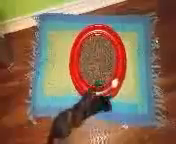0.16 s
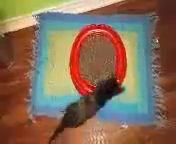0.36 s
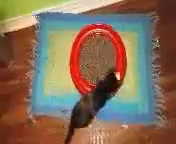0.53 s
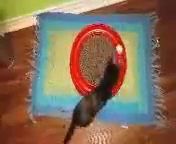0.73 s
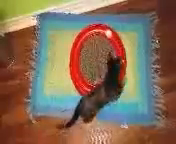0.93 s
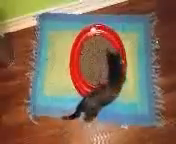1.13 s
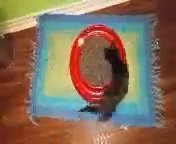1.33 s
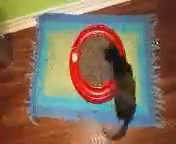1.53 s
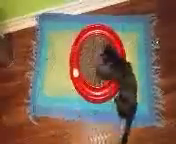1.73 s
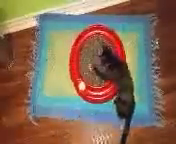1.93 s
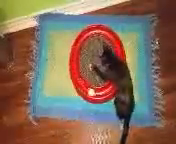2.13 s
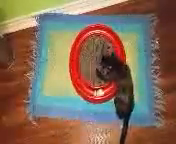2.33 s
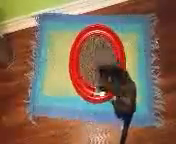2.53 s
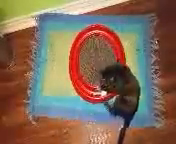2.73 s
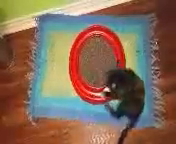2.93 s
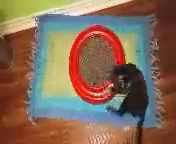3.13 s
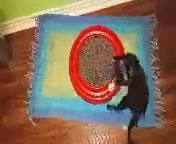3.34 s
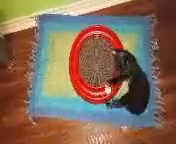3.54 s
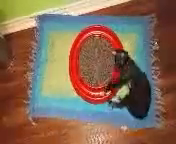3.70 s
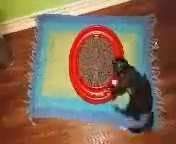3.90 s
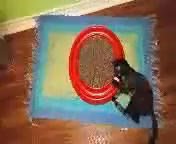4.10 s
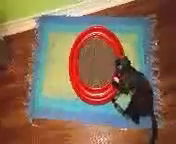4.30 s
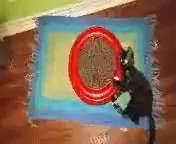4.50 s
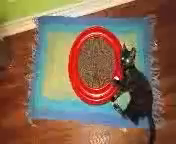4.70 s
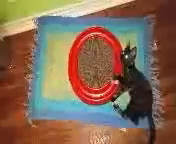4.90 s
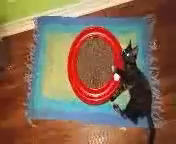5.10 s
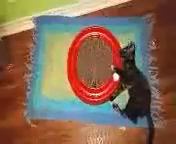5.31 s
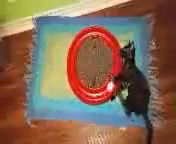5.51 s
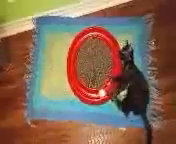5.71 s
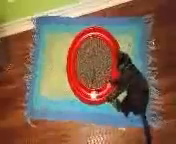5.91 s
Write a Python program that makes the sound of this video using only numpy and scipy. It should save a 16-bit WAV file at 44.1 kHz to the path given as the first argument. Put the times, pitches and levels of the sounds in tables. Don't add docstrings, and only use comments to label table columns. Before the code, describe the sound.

A light ball rumbles round a hollow plastic ring while a cat bats it with dull knocks, then sparser taps over steady hiss.

```python
import sys
import numpy as np
from scipy import signal
from scipy.fft import rfft, irfft
from scipy.io import wavfile
from scipy.ndimage import uniform_filter1d

SR = 44100
rng = np.random.default_rng(int(sys.argv[2]) if len(sys.argv) > 2 else 0)


def invert_db(x):
    u = np.asarray(x, float) / 20
    return 10 ** u


def wav_record(signal):
    frames = np.transpose(np.atleast_2d(signal))
    bounded = np.clip(frames, -1, 1)
    quanta = np.round(bounded * 32767).astype(np.int16)
    wavfile.write(sys.argv[1], SR, quanta)


N = 262395


def evened(x):
    return x / np.sqrt(np.mean(x ** 2) + 1e-20)


def read(points, hz, axis=1):
    columns = np.transpose(points)
    return np.interp(np.log(hz + 1), np.log(columns[0] + 1), columns[axis])


def follow(rows, axis=1):
    columns = np.transpose(rows)
    return np.interp(np.arange(N) / SR, columns[0], columns[axis])


def add(mix, s, sound):
    part = mix[..., round(s * SR):][..., :sound.shape[-1]]
    part += sound[..., :part.shape[-1]]


def coloured(x, colour):
    size = x.shape[-1]
    gain = invert_db(read(colour, np.fft.rfftfreq(size, 1 / SR)))
    return irfft(rfft(x) * gain, size)


def wander(smooth_s, channels):
    width = max(int(smooth_s * SR / 64), 1)
    steps = rng.standard_normal((channels, N // 64 + 2))
    steps = evened(uniform_filter1d(uniform_filter1d(steps, width), width))
    return np.repeat(steps, 64, axis=1)[:, :N]


def sides(db):
    return np.array([invert_db(np.divide(db, 2)), invert_db(-np.divide(db, 2))])


def swells(s, peak_db, rise_s, t60):
    t = np.arange(0, N, 64)[:, None] / SR - s
    shape_db = np.where(t < 0, -9 * (t / rise_s) ** 2, -60 * t / t60)
    gain = invert_db(peak_db + shape_db.clip(-150))
    return np.repeat(np.sqrt((gain ** 2).sum(1)), 64)[:N]


# (frequency [Hz], level [dB], t60 [s])
RING = [(181.1, -3, 0.18), (243, -8.5, 0.23), (268.3, -3, 0.097), (309.3, 0.5, 0.09), (357, -0.5, 0.1),
        (406.2, 1.5, 0.078), (475, -10, 0.061), (479.2, -10.5, 0.14), (562.7, -5, 0.077),
        (653.7, -12, 0.14), (707, -14.5, 0.076), (777.5, -17.5, 0.071), (825, -24, 0.025), (912, -14, 0.03),
        (1020, -20, 0.025), (1262, -22, 0.018), (1474, -21.5, 0.023), (1690, -20, 0.015)]
# (time [s], peak [dB], hardness [dB/octave], favoured mode [Hz],
# first contact over chatter [dB])
SWATS = [(0.331, -28.5, -1.5, 398, 2.5), (0.536, -25, -5, 327, -0.5), (0.621, -30.5, 2, 326, 5),
         (0.725, -15, 3.5, 390, 4), (2.031, -23.5, 4.5, 280, -3), (2.264, -26, 3.5, 316, -1.5),
         (2.477, -26.5, 2.5, 218, 1.5), (2.491, -20.5, -1.5, 297, 2), (2.529, -25.5, 0, 228, 3.5),
         (3.028, -40, -4, 345, -4), (3.278, -43, -8.5, 392, 1), (3.398, -31.5, 2.5, 378, 2.5),
         (3.479, -44, -5, 238, 1.5), (3.561, -32.5, -0.5, 320, .5), (3.62, -23, -3.5, 317, 2.5),
         (3.927, -27, 3, 318, 1.5), (4.44, -54.5, -4, 413, -2.5), (5.096, -37, -7, 230, -2),
         (5.129, -40, 0, 269, 1.5), (5.5, -46.5, -13, 367, -1.5), (5.585, -35.5, -10.5, 370, 1)]
# (time [s], peak [dB], hardness [dB/octave], favoured mode [Hz],
# first contact over chatter [dB])
KNOCKS = [(0.028, -33.5, 3, 278, 8.5), (0.212, -39.5, 0.5, 219, 0.5), (0.495, -44.5, -6, 400, -1),
          (0.82, -25.5, 2.5, 320, -6.5), (0.907, -31.5, 5, 356, 4), (0.935, -31.5, 0, 350, 3),
          (1.03, -31, 4, 340, 2.5), (1.127, -28.5, -12, 350, 6.5), (1.169, -37, -6, 360, 11),
          (1.253, -24.5, -0.5, 300, 3), (1.417, -31, 0.5, 342, -10.5), (1.481, -31.5, 3.5, 230, 3.5),
          (1.645, -27.5, 6.5, 270, 2), (1.826, -32, 3.5, 280, -7), (2.228, -30, -6, 231, 6.5),
          (2.074, -33, 8, 400, 9), (2.297, -33, 7.5, 396, 12), (2.447, -37.5, 4, 197, -0.5),
          (3.952, -38.5, 1.5, 368, 1.5), (3.996, -32.5, -2.5, 400, 1.5), (4.056, -35.5, 2.5, 287, 5),
          (5.715, -41.5, 15, 505, 12), (5.811, -34, -6.5, 353, -6), (5.902, -35, -7, 238, -4)]
HITS = SWATS + KNOCKS
LAG_S = 0.002


def blows():
    rattle_s, rattle_fade_db, load_s, glance_s = 0.085, -8.5, 0.00062, 0.0018
    hz, db, t60 = np.transpose(RING)[:, :, None]
    t, out = np.arange(SR // 2) / SR, np.zeros(N)
    modes = invert_db(db - 60 * t / t60) * np.sin(2 * np.pi * hz * t)
    modes *= 1 - np.exp(-t / load_s)
    chance = rng.random((len(HITS), 2, 30))
    uneven = rng.standard_normal((len(HITS), len(RING), 1))
    for (s, peak_db, hardness, favoured_hz, first_db), (when, size), odd in zip(HITS, chance, uneven):
        favour_db = 6.45 * np.exp(-(np.log2(hz / favoured_hz) / 0.33) ** 2)
        tilt_db = np.clip(hardness, -9, 9) * np.log2(hz / 350)
        push = np.where(hz > 600, np.sign(odd), 1)
        shape = invert_db(tilt_db + favour_db + 2 * odd) * push
        knocks = np.zeros(SR // 4)
        at = (np.clip(when * rattle_s, 0, 0.24) * SR).astype(int)
        swell = 0.67 * np.sin(np.pi * when ** 0.41)
        knocks[at] = (2 * size - 1) * swell * invert_db(rattle_fade_db * when)
        knocks[0] = -invert_db(np.clip(first_db, -12, 9))
        ring = signal.fftconvolve((modes * shape).sum(0), knocks)
        rise_s = glance_s * invert_db(-3.0 * first_db)
        ring *= 1 - np.exp(-np.arange(len(ring)) / SR / rise_s)
        add(out, s + LAG_S, invert_db(peak_db) * ring / abs(ring).max())
    return out


# (time [s], rumble level [dB])
ROLL = [(0.0, -42.5), (0.21, -48.5), (0.4, -61.5), (0.68, -47), (0.88, -36), (1.0, -36.5), (1.52, -37),
        (2.15, -41), (2.43, -44), (2.75, -65), (3.38, -62.5), (3.55, -54.5), (4.0, -59.5), (4.32, -71),
        (5.02, -84), (5.45, -67.5), (5.66, -44), (5.95, -44)]


def rolling():
    bumps_per_s, tilt_db_per_octave = 700, 0.25
    bumps = (rng.random(N) < bumps_per_s / SR) * rng.choice([-1., 1.], N)
    bumps = bumps * invert_db(2.56 * np.minimum(rng.exponential(1, N), 4))
    bumps = evened(bumps) * invert_db(follow(ROLL))
    t, out, unit = np.arange(SR // 2) / SR, np.zeros(N), 0
    travel = wander(0.17, channels=len(RING))
    for (hz, db, t60), drift in zip(RING, travel):
        octaves = np.log2(hz / 300)
        loaded_t60 = 0.56 * t60 * (300 / hz) ** 0.3
        mode = invert_db(db + 0.3 * octaves - 60 * t / loaded_t60) * np.sin(2 * np.pi * hz * t)
        drive = bumps * invert_db(0.72 * drift + tilt_db_per_octave * octaves)
        out += signal.fftconvolve(drive, mode * rng.choice([-1, 1]))[:N]
        unit += (mode ** 2).sum()
    return invert_db(-5.0) * out / np.sqrt(unit)


# (frequency [Hz], width [Hz])
HOLLOW_MODES = [(233, 5.2), (356, 14.1)]
# (level under the blow [dB], t60 [s])
HUM_BLOW = [(-16, 0.55), (-12, 0.12)]


def hollow():
    roll_db, rise_s, reach_octaves = -13, 0.012, 0.27
    t, out = np.arange(N) / SR, np.zeros(N)
    s, peak_db, _, favoured_hz, _ = np.transpose(HITS)
    for (hz, width), (under_db, t60) in zip(HOLLOW_MODES, HUM_BLOW):
        r = np.exp(-np.pi * width / SR)
        noise = rng.standard_normal(N) + 1j * rng.standard_normal(N)
        slow = signal.lfilter([1], [1, -2 * r, r * r], noise)
        slow /= abs(slow) ** 0.66
        near_db = -6 * (np.log2(hz / favoured_hz) / reach_octaves) ** 2
        level = swells(s + rise_s, peak_db + under_db + near_db, rise_s * 0.92, t60)
        level = level + invert_db(follow(ROLL) + roll_db)
        out += evened((slow * np.exp(2j * np.pi * hz * t)).real) * level
    return out


def softened(x, low_hz, high_hz):
    low_cut = signal.butter(3, low_hz, "high", fs=SR, output="sos")
    high_cut = signal.butter(2, high_hz, fs=SR, output="sos")
    return signal.sosfilt(np.vstack([low_cut, high_cut]), x)


# (frequency [Hz], t60 [s])
ROOM = [(150, 0.13), (500, 0.16), (2000, 0.9), (12000, 0.099)]


def room(x, wet_db):
    taps = np.zeros((2, SR // 2))
    at = np.arange(240, SR // 2 - 20, 20) + rng.integers(0, 20, (2, (SR // 2 - 241) // 20))
    np.put_along_axis(taps, at, rng.choice([-1., 1.], at.shape), 1)
    hz, t, z = signal.stft(taps, SR, nperseg=512)
    decay = invert_db(-60 * t / read(ROOM, hz)[:, None])
    tail = signal.istft(z * decay, SR, nperseg=512)[1]
    tail = tail / np.linalg.norm(tail[0])
    return x + invert_db(wet_db) * signal.fftconvolve(np.atleast_2d(x), tail, axes=1)[:, :N]


# (frequency [Hz], level [dB])
GRIT_COLOUR = [(500, -38.5), (850, 4), (1200, -3.5), (1600, -4.5), (1950, -8.5), (2400, -16.5),
               (3500, -18.5), (6000, -34.5), (8000, -53)]


def clacks():
    spray_rise_s, spray_t60_s = 0.0078, 0.25
    out, t = np.zeros((2, N)), np.arange(8192) / SR
    sprays = coloured(rng.standard_normal((len(HITS), 2, 8192)), GRIT_COLOUR)
    for (s, peak_db, hardness, _, first_db), spray in zip(HITS, sprays):
        rise = 1 - np.exp(-t / (spray_rise_s * invert_db(-3.0 * first_db)))
        level_db = peak_db - 32.0 + 0.89 * np.clip(hardness, -9, 9)
        add(out, s + LAG_S, invert_db(level_db - 60 * t / spray_t60_s) * rise * evened(spray))
    return out


def grit():
    level_db, roll_share, tires_db_per_s = -60.5, 0.69, 2
    both, left, right = rng.standard_normal((3, N)) * invert_db(0.76 * wander(0.004, channels=1))
    crackle = coloured(np.array([both + 1.5 * left, both + 1.5 * right]), GRIT_COLOUR)
    roll_db = roll_share * (follow(ROLL) + 36)
    return evened(crackle) * invert_db(level_db + roll_db - tires_db_per_s * np.arange(N) / SR)


# (time [s], peak [dB], frequency [Hz], length [s], left-right [dB])
GRIP = [(0.623, -35.5, 171, 0.022, 0.5), (0.72, -31.5, 148, 0.041, -1), (1.016, -39, 140, 0.033, 0.5),
        (1.263, -36.5, 103, 0.03, 7), (2.03, -41, 149, 0.023, -1), (2.159, -20, 111.6, 0.02, 9.5),
        (2.202, -27.5, 109, 0.012, 11), (2.221, -26, 91, 0.02, 10.5), (2.439, -37, 173, 0.018, -1),
        (2.506, -44.5, 152, 0.039, 16), (2.528, -33, 145, 0.042, 1.5), (2.732, -47.5, 64.5, 0.027, 11),
        (3.178, -44.5, 142, 0.022, -3), (3.398, -37.5, 173, 0.023, 0.5), (3.516, -38, 119, 0.021, 9),
        (3.554, -41, 173, 0.061, 0.5), (3.618, -20, 164, 0.013, 0.5), (3.862, -49, 154, 0.044, 0),
        (4.801, -28.5, 99.6, 0.019, 9.5), (5.316, -28.5, 110.5, 0.0082, 12.5),
        (5.35, -52, 128, 0.021, 20.5), (5.936, -16.5, 82, 0.011, 10.5)]


def grip():
    out = np.zeros((2, N))
    for s, peak_db, hz, length, pan_db in GRIP:
        t = np.arange(0, length, 1 / SR)
        turns = hz * t * (1.3 - 0.36 * t / length)
        early = np.array([[0], [2.25 * np.clip(pan_db / 8, 0, 1)]])
        wave = -np.sin(2 * np.pi * turns + early)
        wave += 0.092 * np.sin(2 * np.pi * 3.6 * turns) * invert_db(-60 * t / 0.038)
        envelope = np.sin(np.pi * (t / length) ** 0.75) ** 0.92
        add(out, s, invert_db(peak_db - 1.5) * sides(pan_db)[:, None] * wave * envelope)
    return signal.sosfilt(signal.butter(2, 45, "high", fs=SR, output="sos"), out)


# (time [s], peak [dB], swell [s], fade t60 [s])
RUSTLE = [
    (0.33, -72.5, 0.026, 0.33),
    (0.64, -70.5, 0.081, 0.84),
    (0.76, -55, 0.053, 0.62),
    (0.915, -69, .03, 0.43),
    (2.05, -80.5, 0.062, 0.43),
    (2.45, -71, 0.019, 0.32),
    (4.02, -55.5, 0.04, 0.37),
    (5.63, -57.5, 0.063, 0.56),
    (5.96, -83, 0.024, 0.25),
]
# (frequency [Hz], level [dB])
RUSTLE_COLOUR = [(2500, -33.5), (4500, -38), (6500, -26.5), (8000, -45.5), (9200, -26.5), (11000, -10.5),
                 (12000, 1.5), (13000, 5)]
# (peak [dB], t60 [s])
SNAP = (-24, 0.2)
# (frequency [Hz], level [dB])
SNAP_COLOUR = [(900, -17), (1500, -4), (2500, -26.5), (4500, -26), (6500, -26), (8000, -42), (10000, -22),
               (12300, -3.5), (13200, 0.5)]


def rustle():
    roll_db, roll_share, pan_db, snap_s = -77.5, 0.44, -7.5, 0.9095
    grains = rng.standard_normal((2, N)) * invert_db(2.0 * wander(0.003, channels=1))
    out = evened(coloured(grains, RUSTLE_COLOUR)) * invert_db(8.0) * sides(pan_db)[:, None]
    out *= swells(*np.transpose(RUSTLE)) + invert_db(roll_db + roll_share * (follow(ROLL) + 33))
    peak_db, t60 = SNAP
    t = np.arange(8192) / SR
    decay = invert_db(-60 * t / t60) + 1.2 * invert_db(-60 * t / 0.038)
    snap = evened(coloured(rng.standard_normal((2, 8192)), SNAP_COLOUR))
    snap = snap * decay * (1 - np.exp(-t / 0.00064))
    add(out, snap_s, invert_db(peak_db - 2.0) * snap * np.array([[0.26], [1]]))
    return out


# (time [s], hiss level [dB])
MOTOR = [(0.0, -53), (0.5, -55.5), (0.93, -53), (2.5, -53), (2.83, -57), (3.2, -58.5), (3.69, -54.5),
         (3.8, -56.5), (4.04, -55), (4.22, -58), (5.07, -58.5), (5.44, -57), (5.95, -54)]
# (frequency [Hz], density [dB per Hz])
MOTOR_COLOUR = [(1350, -33.5), (2300, -33.5), (2590, -20), (3020, -7.5), (3850, 5.5), (4580, 6.5),
                (5280, 0), (6870, -21), (7410, -32.5), (8500, -109), (11000, -65), (18700, -120)]


def motor():
    hiss = evened(coloured(rng.standard_normal((2, N)), MOTOR_COLOUR))
    port_db = np.array([[6.0], [-20.]])
    return hiss * invert_db(follow(MOTOR) + port_db + 0.14 * wander(0.021, channels=1))


# (frequency [Hz], left [dB], right [dB], left-right likeness [0-1])
FLOOR = [(19.3, -80.5, -87.5, 0.14), (60.5, -80, -83.5, 0.34), (145, -86.5, -90, 0.47),
         (267, -93, -94.5, 0.36), (410, -93.5, -101.5, 0.82), (650, -106, -107, 0.21),
         (1100, -112, -112, 0.059), (2200, -116, -116, 0.032), (4150, -112, -111, .02),
         (6360, -125, -124, .02), (8300, -138, -136, .02), (10300, -130, -130, 0.019),
         (13100, -126, -124, .02)]


def floor():
    hz = np.fft.rfftfreq(N, 1 / SR)
    a, b = rfft(rng.standard_normal((2, N)))
    same = np.clip(read(FLOOR, hz, axis=3), 0, 1)
    left = a * invert_db(read(FLOOR, hz))
    right = (same * a + np.sqrt(1 - same ** 2) * b) * invert_db(read(FLOOR, hz, axis=2))
    lift_db = 0.8 * (follow(MOTOR) + 58) + 0.37 * wander(0.08, channels=2)
    return irfft(np.array([left, right]), N) * np.sqrt(SR / 2) * invert_db(lift_db)


def scene():
    ring = softened(blows() + rolling() + hollow(), low_hz=131, high_hz=2350)
    toy = room(ring, wet_db=-8.0) * sides(-0.53)[:, None]
    return toy + clacks() + grit() + grip() + rustle() + motor() + floor()


def thinned(x, masked_db, weak_db, kept):
    hz, _, z = signal.stft(x, SR, "cosine", nperseg=2048, noverlap=1024)
    hz, power = hz[:, None], abs(z) ** 2
    cell = uniform_filter1d(power, size=5, axis=1)
    usual = uniform_filter1d(power, size=31, axis=1)
    around = uniform_filter1d(usual, size=45, axis=1)
    masked = (cell < around * invert_db(2 * masked_db)) & (hz > 1700)
    weak = cell < usual * invert_db(2 * weak_db)
    dropped = (masked | weak) & (hz > 1250)
    z = np.where(dropped, kept * z, z)
    return signal.istft(z, SR, "cosine", nperseg=2048, noverlap=1024)[1][:, :N]


def band_limit(x):
    return signal.sosfilt(signal.butter(12, 13890, fs=SR, output="sos"), x)


def record(dry):
    edge = signal.firwin(801, 13050, window=("kaiser", 7), fs=SR)
    thin = thinned(dry, masked_db=-7.5, weak_db=-3.0, kept=0.08)
    limited = signal.oaconvolve(thin, edge[None], "same")
    return band_limit(limited)


dry = scene()
out = record(dry)
wav_record(out)
```